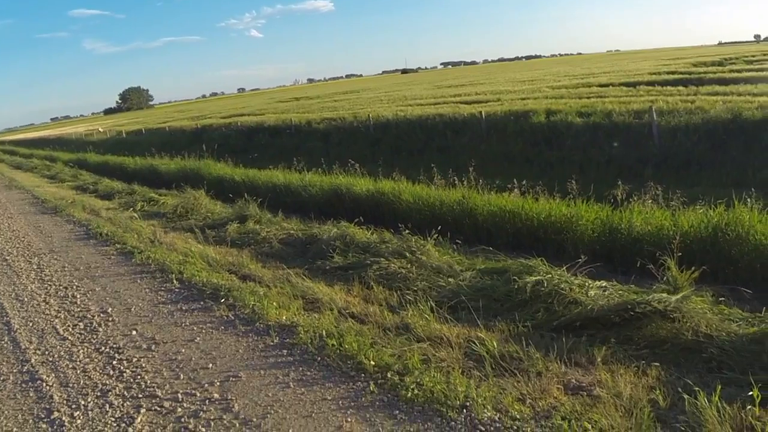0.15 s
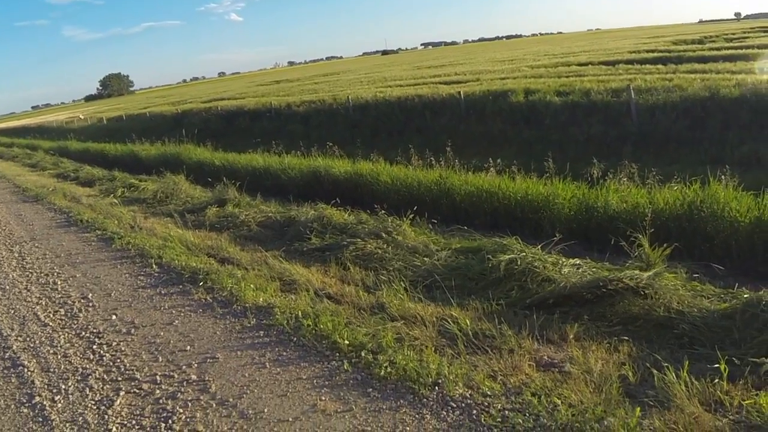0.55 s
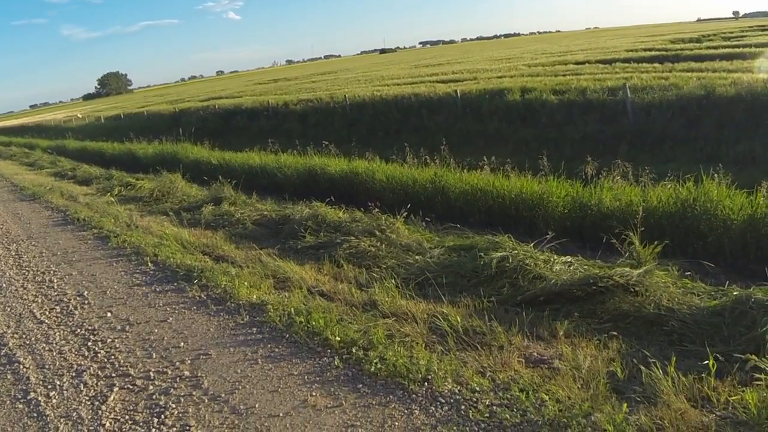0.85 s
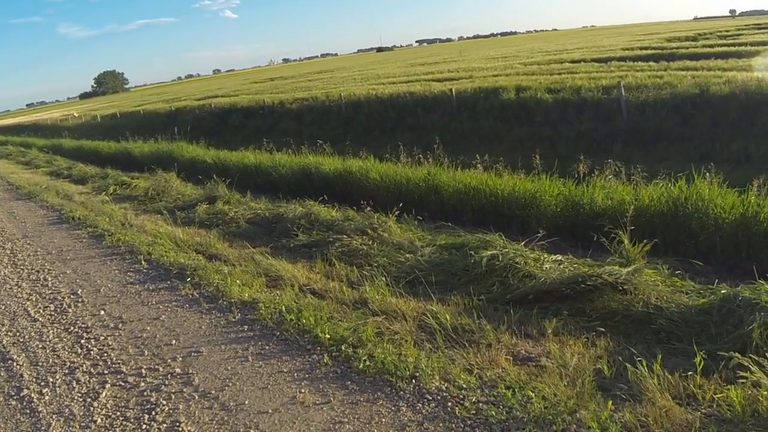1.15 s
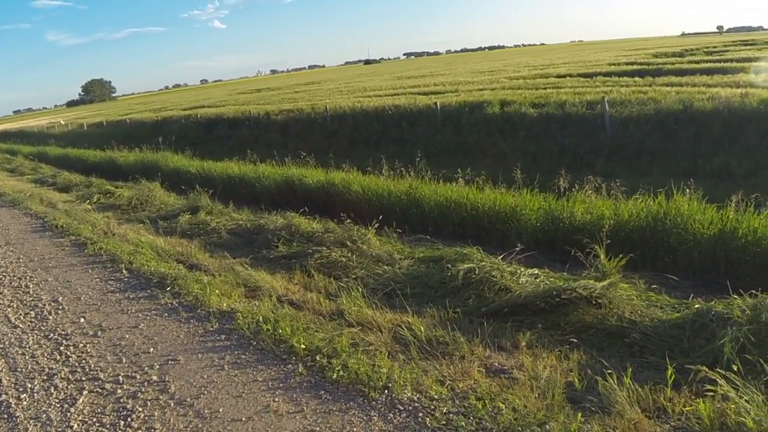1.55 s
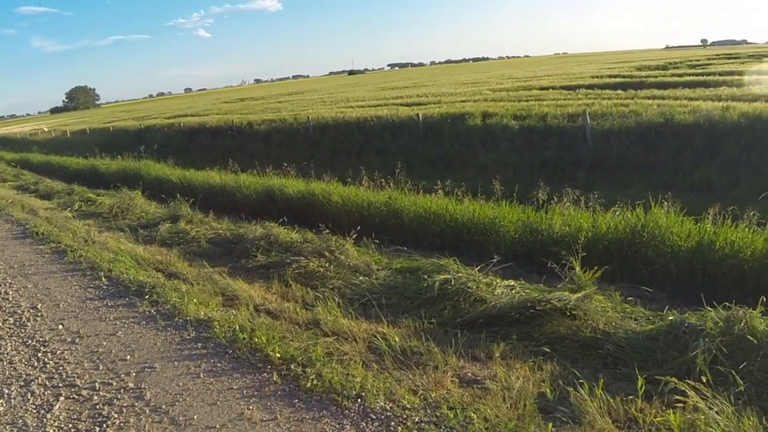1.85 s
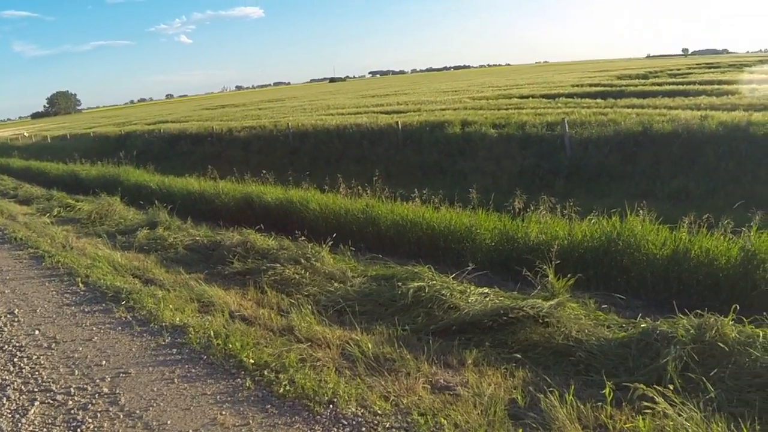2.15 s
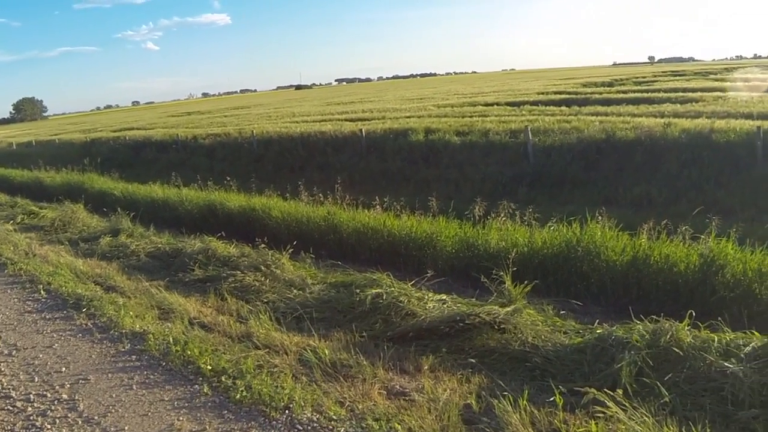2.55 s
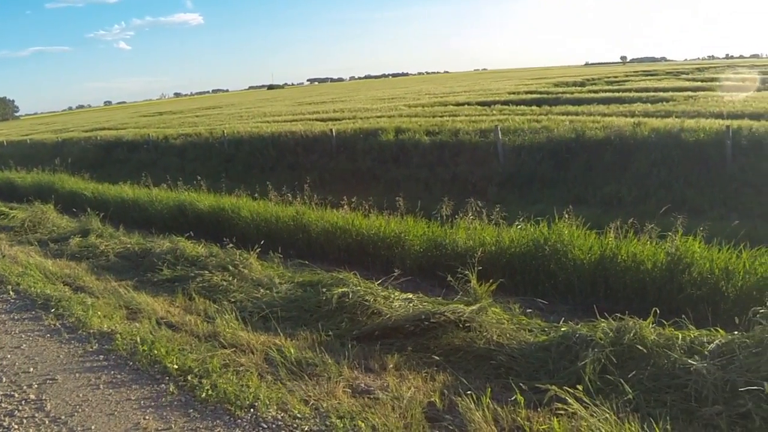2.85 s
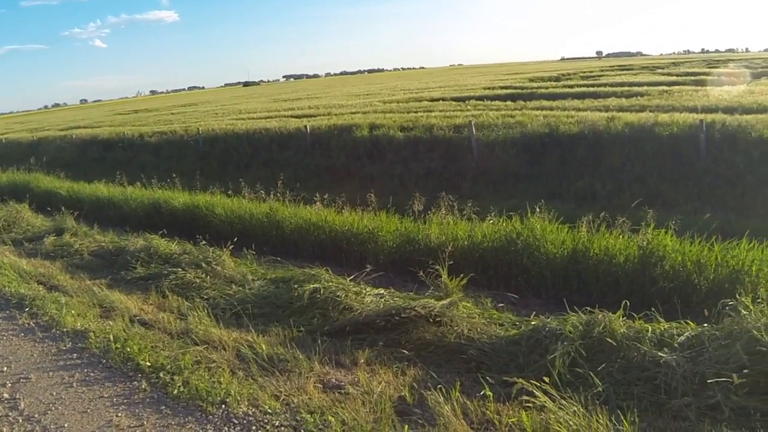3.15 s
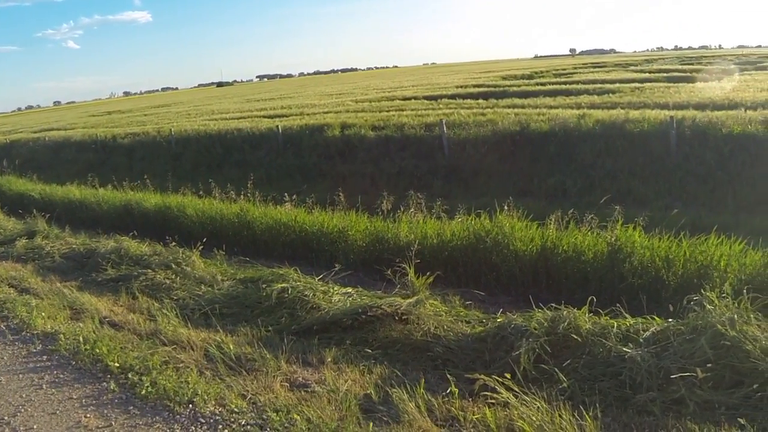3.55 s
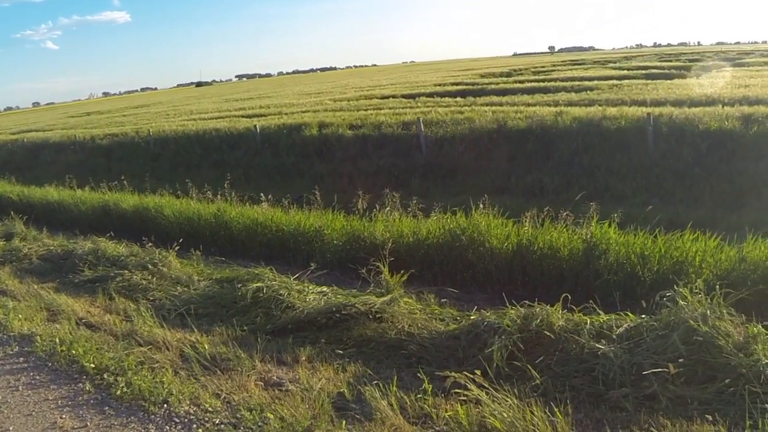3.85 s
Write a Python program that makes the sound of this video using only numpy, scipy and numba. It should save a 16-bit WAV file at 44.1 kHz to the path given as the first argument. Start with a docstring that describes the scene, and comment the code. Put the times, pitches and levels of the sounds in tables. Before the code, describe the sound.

Raspy, trembling crow caws repeat nine times and grow nearer outdoors, then stop, leaving faint field ambience, grass and gravel rustle and a few dry ticks near the microphone.

```python
"""A crow flies closer over an open field and caws nine times: trembling pulses and breath noise pass
the resonances of windpipe, throat, mouth and beak, and dull echoes return from the field.
Light wind rumbles on the microphone as gusts of low noise, over a faint coloured ambience.
Grass and gravel rustle and tick nearby as struck resonances and decaying tones.
A far insect chirps in rounded tone bursts, and a thin high sine tone whines."""
import sys
import numpy as np
from scipy import signal
from scipy.fft import rfft, irfft, next_fast_len
from scipy.io import wavfile
from scipy.ndimage import uniform_filter1d
from numba import njit

SR = 44100
rng = np.random.default_rng(int(sys.argv[2]) if len(sys.argv) > 2 else 0)


def to_wav(sig):
    """Store sig (one row per channel, or 1-D mono) as 16-bit WAV at the path in sys.argv[1].

    Samples outside -1..1 are clipped; the rate is SR.
    """
    pcm = np.clip(np.atleast_2d(sig), -1, 1) * 32767
    pcm = np.round(pcm).astype(np.int16)
    wavfile.write(sys.argv[1], SR, pcm.T)  # frames by channels


def makeup_ratio(level_db):
    """Linear amplitude ratio for a level in decibels (20 dB per factor of ten)."""
    decades = np.asarray(level_db, float) / 20
    return 10 ** decades


N = 176400   # samples, 4 s

# gusts on the microphone: time_s, level_db
GUSTS = [(0.04, -39), (0.16, -45.5), (0.23, -34.5), (0.36, -46.5), (1.12, -36), (1.18, -31.5),
         (1.37, -48.5), (3.97, -48.5), (4.0, -66)]
# wind spectrum, relative: frequency_hz, density_db (per Hz)
WIND_SPECTRUM = [(8.8, -24), (15, -6.5), (45, 4), (97, -9.5), (141, -9.5), (231, -31), (400, -35.5),
                 (520, -25.5), (880, -120)]
# field ambience spectrum, relative: frequency_hz, density_db (per Hz)
AMBIENCE_SPECTRUM = [(59, -30.5), (100, -4.5), (156, -1.5), (200, -9), (385, -11.5), (496, -15.5),
                     (806, -12), (1450, -29.5), (1580, -20), (2360, -25), (2980, -23.5), (3670, -34),
                     (4700, -34.5), (6300, -43), (7400, -36.5), (8600, -39), (9800, -45), (11600, -44.5),
                     (15400, -44)]
# one table a caw, pitch before scoop, dive and tremble, rasp before the effort is evened:
# time_s, level_db, pitch_hz, throat_hz, beak_hz, beak_db, rasp_db
CAW_CONTOURS = [
    [(0.03, -34.5, 355.6, 2260, 2980, 15.5, 19), (0.075, -37.5, 347.3, 2010, 2900, 11, 17.5),
     (0.117, -36, 353, 1960, 3000, 17, 14), (0.167, -37, 335, 1950, 3050, 13, 12),
     (0.179, -41, 321.6, 2030, 2900, 13, 15), (0.199, -40, 291, 2020, 2960, 14, 9),
     (0.215, -50, 264, 2010, 3050, 13, 6.0)],
    [(0.345, -71, 291.5, 1830, 3050, 5, 6.0), (0.357, -42.5, 284.5, 1800, 2900, 14, 18),
     (0.389, -38, 326.4, 1910, 2860, 10, 23), (0.439, -36.5, 351, 1820, 2900, 7, 17.5),
     (0.557, -35.5, 339.5, 1800, 3100, 8, 13), (0.615, -41.5, 277, 1800, 3440, 14, 6),
     (0.63, -66, 281, 1880, 3200, 18, 8)],
    [(0.755, -43, 258.3, 1800, 3080, 11, 15), (0.793, -34, 303, 1920, 3360, 1, 15),
     (0.819, -33, 311.6, 1960, 3370, 8, 10), (0.847, -31, 305.7, 1910, 3340, 12.5, 10.5),
     (0.909, -31, 298.7, 1840, 3100, 15, 12), (0.977, -36.5, 246, 2100, 3100, 12, 6.5),
     (0.99, -70, 228, 1990, 3120, 22, 6.0)],
    [(1.15, -41, 252.2, 1740, 2980, 7, 12), (1.206, -30.5, 318.4, 1860, 3180, 3, 15),
     (1.23, -31, 331.2, 1920, 3200, -14, 13), (1.284, -28, 342, 1960, 2960, 5.5, 8),
     (1.346, -27.5, 308.2, 1550, 3160, 13.5, 3), (1.366, -28, 271.5, 1800, 2950, 8, 2),
     (1.395, -56.5, 277, 1900, 3100, 3, 18)],
    [(1.555, -61, 264, 1780, 3110, 31, 6.0), (1.563, -35.5, 271.9, 1670, 3000, 6, -3),
     (1.607, -28, 296, 1810, 3230, 4, 5), (1.659, -25, 311.9, 1850, 3320, 9, 7.5),
     (1.741, -22.5, 288.2, 1780, 3250, 14.5, -4), (1.783, -27.5, 249, 1910, 3070, 7, 0),
     (1.805, -61, 231, 1850, 3100, 21, 20)],
    [(1.925, -41.5, 275.6, 1740, 3240, 4, 3), (1.955, -26.5, 284.2, 1720, 3320, -1, 6.0),
     (2.007, -24, 318, 1810, 2920, -9, 4), (2.059, -22.5, 325.7, 1740, 3100, 6, -21),
     (2.117, -20, 291.4, 1720, 3500, 11.5, -22), (2.141, -28, 248.6, 1680, 3200, 5, -15),
     (2.165, -53, 249, 1730, 3240, 19, 20)],
    [(2.305, -40, 268.3, 2010, 3340, 11, 6), (2.335, -29.5, 287.8, 1740, 3440, -6, 23),
     (2.389, -27, 315.2, 1990, 3600, -4, 21), (2.415, -24, 316.5, 2030, 3670, 1.5, 19),
     (2.475, -22.5, 343.4, 2110, 3780, 14, 8.5), (2.549, -24.5, 285, 2300, 3860, 11, -6),
     (2.572, -59, 247, 2350, 3400, 23, 12)],
    [(2.715, -37, 287, 1950, 3190, 11, 12), (2.741, -27.5, 283.8, 1880, 3140, 2, 21),
     (2.795, -23, 313, 1940, 4000, 5, 19), (2.865, -21.5, 333.3, 2050, 3900, 16.5, 10.5),
     (2.939, -19.5, 319.4, 1930, 3660, 18.5, 4.5), (2.975, -21.5, 270.8, 2020, 3560, 17.5, -3),
     (3.003, -48, 270, 2100, 3550, 12, 14)],
    [(3.095, -42, 255, 2060, 3070, 12, 11), (3.111, -27, 252.3, 2030, 2880, 9, 12),
     (3.127, -23.5, 275, 2080, 3100, 10.5, 14.5), (3.147, -21.5, 287.7, 1930, 3140, 7, 20),
     (3.197, -20.5, 295.1, 1980, 3380, 8, 14.5), (3.223, -24, 240.4, 2140, 2800, 8, 10.5),
     (3.243, -35, 218, 2220, 3770, 14, -4), (3.255, -65, 221, 2200, 3700, 7, -5)],
]
# base share (0-1) of breath noise in each caw, without the extra at its onset and end
BREATH_SHARES = [.04, .05, .06, .10, .04, .05, .09, .06, .06]
# per caw, treble lift as the bird faces the microphone, gaps under the beak and rasp resonances:
# tremble_hz (at the start), lift_db, beak_gap (depth 0-1), rasp_gap (depth 0-1), windpipe_db
CAW_MANNERS = [(18.8, 5, 0.063, 0.14, 11.5), (20.1, 3, 0.11, 0.31, 7.5), (15, 1.5, 0.7, 0.44, 9.5),
               (19.4, 0.5, 0.13, 0.43, 8), (12, -1.5, 0.67, .4, 3.5), (21.9, -1, 0.77, 1, 4.5),
               (16.8, 3.5, 1, 1, -1), (18.4, 7.5, 0.11, 0.088, 1.7), (17.4, 10, 0.13, 0.067, 2)]
# per caw: throat_width_hz, mouth_hz, mouth_db, beak_width_hz, rasp_hz (mid-caw)
VOCAL_TRACTS = [(600, 4130, 12.5, 170, 5200), (390, 2420, 2, 380, 5180), (384, 2500, 1.5, 360, 4800),
                (400, 2400, 4, 520, 4950), (392, 2600, 4.5, 340, 5040), (394, 2600, 1, 320, 5080),
                (600, 2540, 5.5, 560, 5180), (407, 2730, 5.5, 310, 4880), (407, 2500, 3.5, 350, 4770)]
# per caw: mean delay_ms of a close reflection that combs the treble
REFLECTION_DELAYS_MS = [0.377, 0.375, 0.49, 0.466, .47, 0.47, 0.48, .47, 0.451]
# windpipe and microphone response: frequency_hz, gain_db
VOICE_RESPONSE = [(260, -82), (450, -7), (623, -9), (755, -1.5), (875, -2), (985, -2.5), (1090, -6.5),
                  (1360, -8), (1730, 1.5), (1940, -2.5), (2980, -6), (3950, -12), (5080, -19.5),
                  (5900, -30.5), (6700, -28), (7920, -28.5), (8650, -28), (9600, -32.5), (10800, -29.5),
                  (15400, -43)]
# echoes off the field: delay_s, gain_db
ECHOES = [(0.02, -28.5), (0.082, -34), (0.131, -35.5)]
# far insect: start_s, peak_db
INSECT_CHIRPS = [(0.2384, -53), (0.265, -58), (0.295, -63), (0.3232, -52), (1.0744, -58), (3.455, -49)]
# low knocks: start_s, level_db, pitch_hz
LOW_KNOCKS = [(0.567, -26.5, 995), (0.68, -38, 880), (0.71, -31, 734), (0.848, -22.5, 825),
              (1.469, -27, 830), (1.492, -35, 830), (1.502, -40, 904), (1.855, -38, 950), (2.637, -55, 600),
              (2.643, -24.5, 1030)]
# sharper ticks: start_s, level_db, pitch_hz
SHARP_TICKS = [(1.0171, -39.5, 1800), (1.0545, -42, 1660), (2.262, -32, 1990), (3.5603, -40, 1860),
               (3.678, -52, 2750), (3.7196, -29.5, 2050), (3.894, -40, 1870), (3.974, -39, 2000)]
# thin snaps: start_s, level_db, pitch_hz
THIN_SNAPS = [(3.806, -48, 8340), (3.8938, -43.5, 8700)]


def rms_one(x):
    """Normalisation: division by the root mean square gives unit power."""
    return x / np.sqrt(np.mean(x ** 2) + 1e-20)


def at_hz(points, hz):
    """Logarithmic frequency scale: a spectrum is interpolated linearly in dB over log frequency."""
    table_hz, table_db = np.array(points).T
    return np.interp(np.log(hz + 1), np.log(table_hz), table_db)


def drift(rate_hz, size=N):
    """Low-pass random process: white noise through two equal one-pole filters, spread 1."""
    r = np.exp(-2 * np.pi * rate_hz / SR)
    settle = 20000   # samples discarded while the filter settles
    slow = signal.lfilter([1], [1, -2 * r, r * r], rng.standard_normal(size + settle))
    return rms_one(slow[settle:])


def colour(x, spectrum):
    """Minimum-phase filtering: a folded cepstrum gives the causal response of a magnitude spectrum."""
    size = next_fast_len(len(x) + 8192)
    size += size % 2
    gain = makeup_ratio(at_hz(spectrum, np.fft.rfftfreq(size, 1 / SR)))
    cepstrum = irfft(np.log(gain), size)
    cepstrum[1:size // 2] *= 2
    cepstrum[size // 2 + 1:] = 0
    return irfft(rfft(x, size) * np.exp(rfft(cepstrum)), size)[:len(x)]


@njit
def resonance(x, hz, width_hz, sr):
    """Damped oscillator: a two-pole filter with a moving centre, gain 1 at its peak."""
    y, r = np.zeros(len(x)), np.exp(-np.pi * width_hz / sr)
    for i in range(2, len(x)):
        drive = (1 - r * r) / 2 * (x[i] - x[i - 2])
        y[i] = drive + 2 * r * np.cos(2 * np.pi * hz[i] / sr) * y[i - 1] - r * r * y[i - 2]
    return y


def patchy_noise(spectrum, patchy_db, rate_hz):
    """Amplitude-modulated noise: octave bands flicker independently, then are coloured; rms 1."""
    edges_hz, out = 15 * 2.0 ** np.arange(11), 0
    for low, high in zip(edges_hz, edges_hz[1:]):
        band_pass = signal.butter(2, [low, high], "band", fs=SR, output="sos")
        band = signal.sosfilt(band_pass, rng.standard_normal(N))
        out = out + band * makeup_ratio(patchy_db * drift(rate_hz))
    return rms_one(colour(out, spectrum))


def wind():
    """Wind noise at a microphone: low-frequency noise whose level follows the gusts."""
    gust_db = np.interp(np.arange(N) / SR, *np.transpose(GUSTS))
    return makeup_ratio(gust_db) * patchy_noise(WIND_SPECTRUM, patchy_db=1.5, rate_hz=9.9)


def ambience():
    """Diffuse background: broadband coloured noise of constant overall rms."""
    return makeup_ratio(-48) * patchy_noise(AMBIENCE_SPECTRUM, patchy_db=2.0, rate_hz=8.3)


def rustle():
    """Impulse excitation: random ticks of grass and grit are dealt to ten short resonances."""
    rate_per_s, level_db, spread_db = 130, -60.5, -7.5   # the rate is a median
    sizes = makeup_ratio(spread_db * np.minimum(rng.exponential(1, N), 4)) * rng.choice([-1, 1], N)
    struck = rng.random(N) < rate_per_s * makeup_ratio(4 * drift(3)) / SR
    clicks, dealt = sizes * struck, rng.integers(0, 10, N)
    rings = 0
    for k, hz in enumerate(np.geomspace(700, 3600, 10)):
        ring = resonance(clicks * (dealt == k), np.full(N, hz), 0.04 * hz, SR)
        rings = rings + ring / np.sqrt(hz)
    low_pass = signal.butter(4, 3800, fs=SR, output="sos")
    return makeup_ratio(level_db) * rms_one(signal.sosfilt(low_pass, rings))


def whine():
    """Pure tone: a sine of fixed pitch wavers a little in level."""
    pitch_hz, level_db, wobble_db = 11600, -78.5, -1
    tone = np.sqrt(2) * np.sin(2 * np.pi * pitch_hz * np.arange(N) / SR)
    return makeup_ratio(level_db + wobble_db * drift(20)) * tone


def tremble(size):
    """Frequency modulation: a wandering fast cycle rests high and dips sharply."""
    rate_hz, wander, dip = 55.0, 0.05, .22
    cycles = np.cumsum(rate_hz * (1 + wander * drift(5.84, size=size))) / SR
    turn = 2 * np.pi * (rng.random() + cycles)
    return np.cos(turn) - dip * np.cos(2 * turn)


def voice_pulses(pitch, phase):
    """Harmonic series: partials with scattered phases make smeared puffs and swell separately."""
    patchy_db, patches_hz, treble_patches_hz, treble_patchier = 1.5, 7.8, 14, 2.2
    smear_rad, scatter_rad = .21, 1.28
    k = np.arange(1, 60)[:, None]
    rates = [patches_hz if j < 11 else treble_patches_hz for j in range(36)]
    swell = makeup_ratio(patchy_db * np.array([drift(rate, size=len(phase)) for rate in rates]))
    # from the twelfth partial up, neighbours share a swell
    swell = swell[np.where(k < 12, k, 6 + k // 2)[:, 0]]
    swell = swell ** np.where(k < 16, 1, treble_patchier)
    lag = smear_rad * k * k + scatter_rad * rng.standard_normal(k.shape)
    partials = swell * np.cos(k * phase + lag) * (k * pitch < 16000)
    return rms_one(np.sum(partials, axis=0))


def breath_noise(phase):
    """Turbulence: airflow noise is modulated once per voice cycle, then high-passed."""
    gated = rms_one(rng.standard_normal(len(phase)) * (1 + 0.34 * np.cos(phase)))
    return signal.sosfilt(signal.butter(1, 900, "high", fs=SR, output="sos"), gated)


def vocal_tract(x, throat, beak, beak_db, rasp_db, beak_gap, rasp_gap, pipe_db, tract):
    """Source-filter principle: formants reinforce the voice and antiresonances cut gaps in it."""
    throat_width, mouth, mouth_db, beak_width, rasp_mid = tract
    rasp = rasp_mid * (1 + .06 * np.linspace(.5, -.5, len(x)))   # sinks 6 % of its centre through a caw
    steady = np.ones(len(x))
    gap_width_hz = 400
    x = x + (makeup_ratio(11.5) - 1) * resonance(x, throat, throat_width, SR)
    x = x + (makeup_ratio(mouth_db) - 1) * resonance(x, mouth * steady, 167, SR)
    x = x + (makeup_ratio(beak_db) - 1) * resonance(x, beak, beak_width, SR)
    x = x + (makeup_ratio(rasp_db) - 1) * resonance(x, rasp, 550, SR)
    x = x - np.clip(beak_gap, 0, 1) * resonance(x, beak - 584, gap_width_hz, SR)
    x = x - np.clip(rasp_gap, 0, 1) * resonance(x, rasp - 600, gap_width_hz, SR)
    x = x + (makeup_ratio(pipe_db) - 1) * resonance(x, 894 * steady, 177, SR)
    return colour(x, VOICE_RESPONSE)


def facing_treble(x, t, db, lift_db, bounce_ms):
    """Directivity and interference: treble follows facing and effort, and a close reflection combs it."""
    lift_above_hz, treble_per_db, bounce_db, bounce_drift = 5960, .3, -5.0, .04
    top = signal.sosfiltfilt(signal.butter(3, lift_above_hz, "high", fs=SR, output="sos"), x)
    # the reflection's delay drifts as the bird moves
    moved = bounce_drift * np.linspace(-1, 1, len(t)) * rng.uniform(-1, 1)
    delay_s = bounce_ms / 1e3 * (1 + moved)
    bounce = makeup_ratio(bounce_db) * np.interp(t - delay_s, t, top)
    return x - top + makeup_ratio(lift_db + treble_per_db * (db - db.max())) * (top + bounce)


def caw(rows, breath, manner, tract, bounce_ms):
    """Voiced call: pulses and breath excite the vocal tract; its level is evened, then shaped."""
    s, *columns = np.transpose(rows)
    tremble_hz, lift_db, beak_gap, rasp_gap, pipe_db = manner
    t = np.arange(s[0], s[-1], 1 / SR)
    size = len(t)
    db, pitch, throat, beak, beak_db, rasp_db = [np.interp(t, s, c) for c in columns]
    onset = np.exp((s[0] - t) / .025)
    since_dive = np.minimum(t - s[-2], 0)   # s, reaches 0 at the last point but one
    shake = tremble(size)

    # pitch: shares lost at the start and end, fading tremble, jitter
    pitch = pitch * (1 - .08 * onset - .1 * np.exp(since_dive / .012))
    pitch = pitch + tremble_hz * np.linspace(1, .3, size) * shake
    pitch = pitch + 2.1 * drift(80.0, size=size)
    phase = 2 * np.pi * np.cumsum(pitch) / SR

    # breath is strongest at the onset and the fraying end
    breath = breath + .4 * onset + .25 * np.exp(since_dive / .015)
    source = np.sqrt(1 - breath) * voice_pulses(pitch, phase) + np.sqrt(breath) * breath_noise(phase)
    source = source * makeup_ratio(.8 * drift(190, size=size))   # shimmer
    x = vocal_tract(source, throat, beak, beak_db, rasp_db, beak_gap, rasp_gap, pipe_db, tract)
    x = facing_treble(x, t, db, lift_db, bounce_ms)

    power = uniform_filter1d(uniform_filter1d(x ** 2, size=900), size=900)
    evened = x / np.sqrt(power + 1e-12)
    attack = np.minimum((t - s[0]) / .009, 1)
    return int(s[0] * SR), evened * makeup_ratio(db + 1.27 * shake) * attack


def field_echoes(x):
    """Delayed reflection: low-passed copies return later and weaker."""
    dull = signal.sosfilt(signal.butter(2, 1800, fs=SR, output="sos"), x)
    n = np.arange(N)
    return sum(makeup_ratio(db) * np.interp(n - s * SR, n, dull, left=0) for s, db in ECHOES)


def crow():
    """Superposition: nine direct calls add to their echoes."""
    calls = np.zeros(N)
    for settings in zip(CAW_CONTOURS, BREATH_SHARES, CAW_MANNERS, VOCAL_TRACTS, REFLECTION_DELAYS_MS):
        i, x = caw(*settings)
        calls[i:i + len(x)] += x
    return calls + field_echoes(calls)


def insect():
    """Tone bursts: Gaussian envelopes round off short blips of one pitch."""
    pitch_hz, peak_after_s = 3100, 0.0044
    t, envelope = np.arange(N) / SR, 0
    for s, db in INSECT_CHIRPS:
        envelope = envelope + makeup_ratio(db) * np.exp(-((t - s - peak_after_s) / peak_after_s * 2) ** 2)
    return np.sin(2 * np.pi * pitch_hz * t) * envelope


def taps(rows, cycles, overtone, crack_db, size):
    """Free decay: two modes lose 60 dB in the given cycles, beside a crack of smoothed noise."""
    overtone_db, rise_cycles, crack_t60_s = -6.0, 0.52, 0.031
    out, t = np.zeros(N + SR), np.arange(1500) / SR
    for s, db, hz in rows:
        ring = np.sin(2 * np.pi * hz * t) + makeup_ratio(overtone_db) * np.sin(2 * np.pi * overtone * hz * t)
        rise = np.sin(np.minimum(t * hz / rise_cycles, 1) * np.pi / 2) ** 2
        ring = makeup_ratio(db) * ring * makeup_ratio(-60 * t * hz / cycles) * rise
        noise = uniform_filter1d(rng.standard_normal(len(t)), size=size)
        crack = noise * makeup_ratio(db + crack_db - 60 * t / crack_t60_s)
        i = int(s * SR)
        out[i:i + len(t)] += ring + crack
    return out[:N]


def knocks():
    """Modal impact: low modes ring for few cycles."""
    return taps(LOW_KNOCKS, cycles=13.7, overtone=1.85, crack_db=-19.0, size=9)


def ticks():
    """Modal impact: higher, closer modes give a sharper tick."""
    return taps(SHARP_TICKS, cycles=22, overtone=1.29, crack_db=-28.0, size=6)


def snaps():
    """Modal impact: very high modes and strong crack noise give a thin snap."""
    return taps(THIN_SNAPS, cycles=46, overtone=1.33, crack_db=-3.5, size=2)


def scene():
    """Linear superposition: all sources add in one channel."""
    background = wind() + ambience() + rustle() + whine()
    events = crow() + insect() + knocks() + ticks() + snaps()
    return (background + events)[None]


def band_limit(x):
    """A steep low-pass at the top of the band."""
    return signal.sosfilt(signal.butter(12, 15740, fs=SR, output="sos"), x)


def record(dry):
    """Band limitation: a steep low-pass cuts the top, and the first 36 ms are silent."""
    low_pass = signal.cheby2(12, 60, 15800, fs=SR, output="sos")
    mix = signal.sosfilt(low_pass, dry) * (np.arange(N) >= .036 * SR)
    return band_limit(mix)


dry = scene()
out = record(dry)
to_wav(out)
```